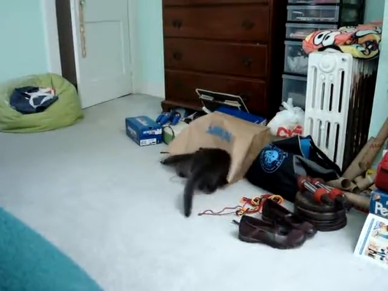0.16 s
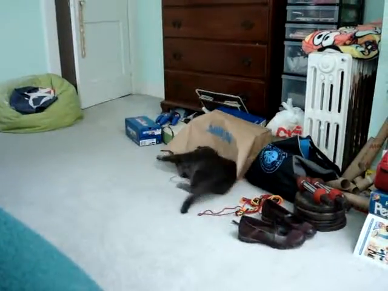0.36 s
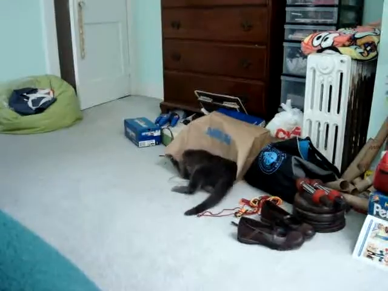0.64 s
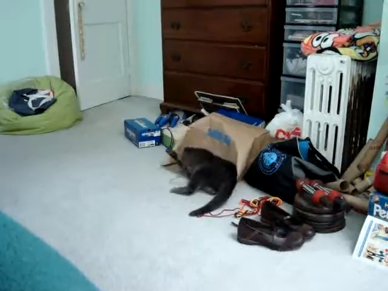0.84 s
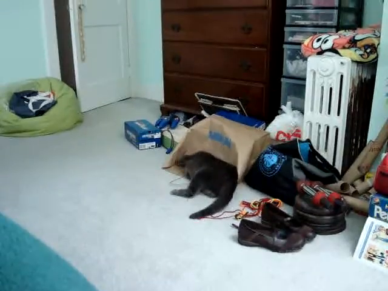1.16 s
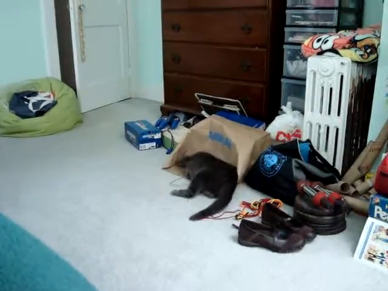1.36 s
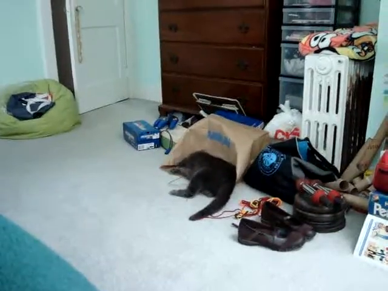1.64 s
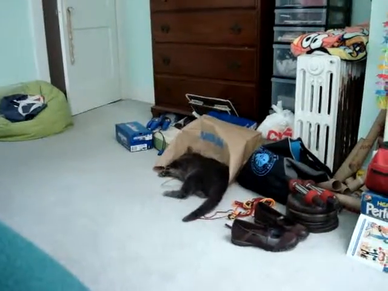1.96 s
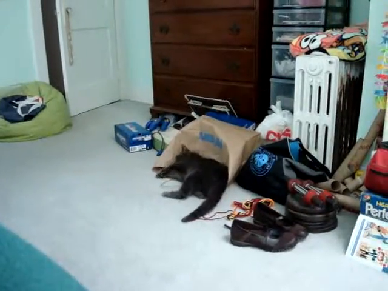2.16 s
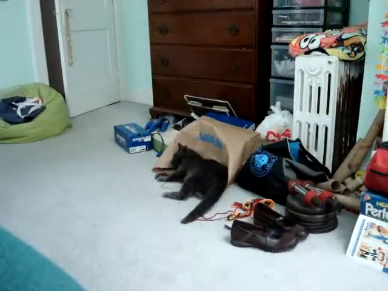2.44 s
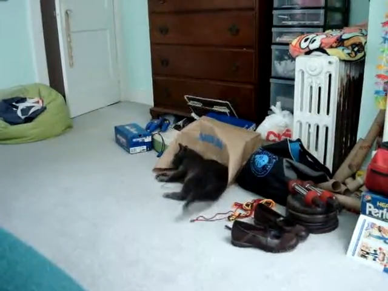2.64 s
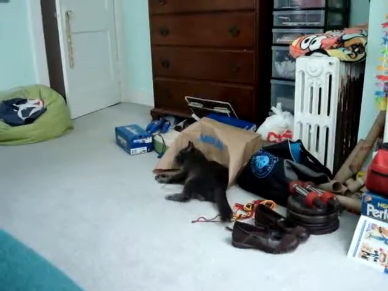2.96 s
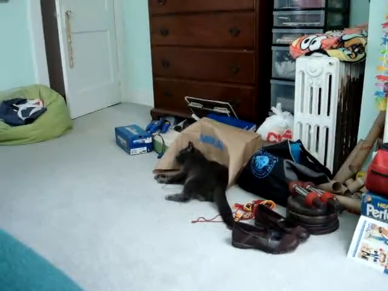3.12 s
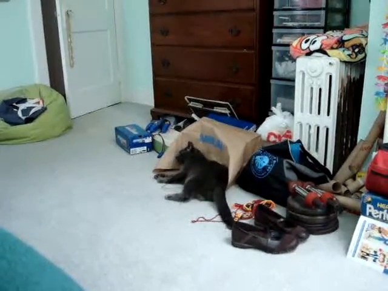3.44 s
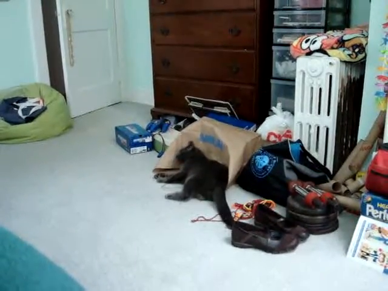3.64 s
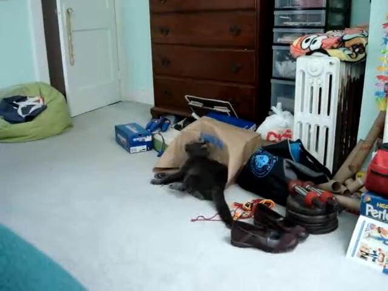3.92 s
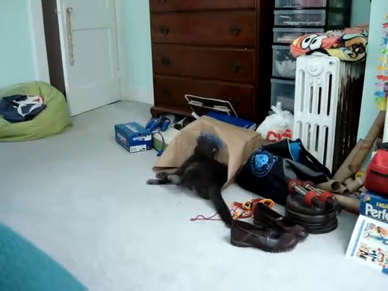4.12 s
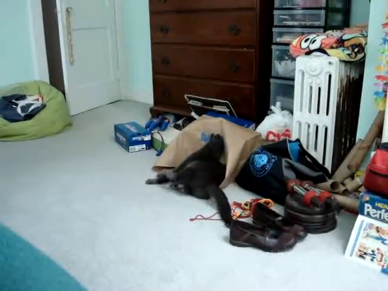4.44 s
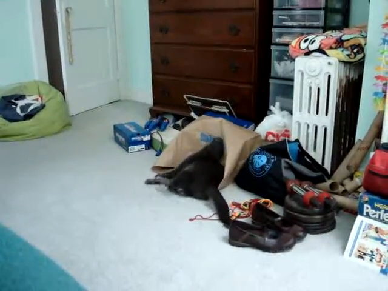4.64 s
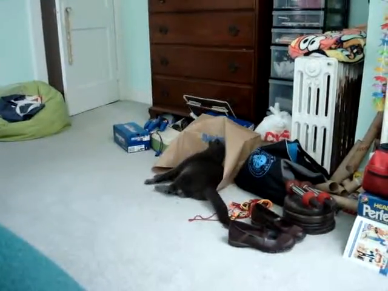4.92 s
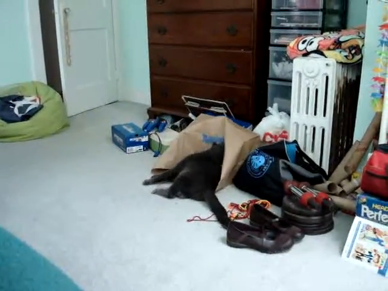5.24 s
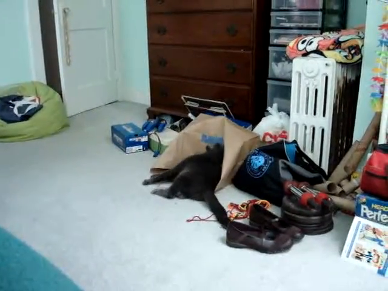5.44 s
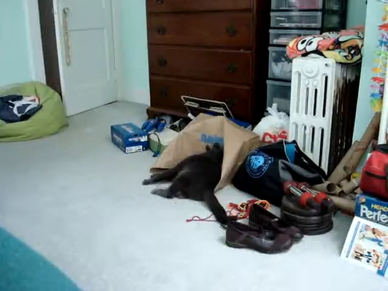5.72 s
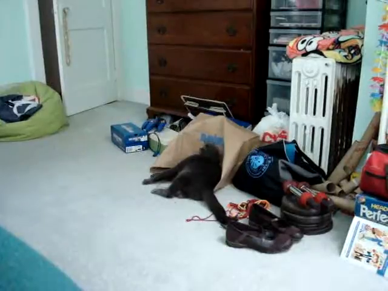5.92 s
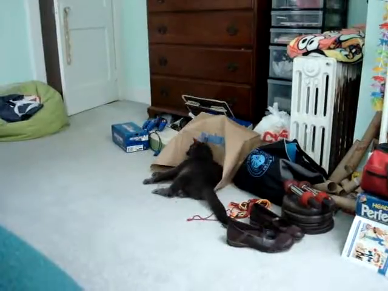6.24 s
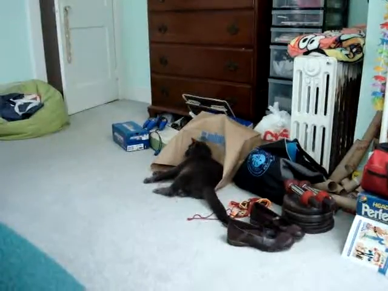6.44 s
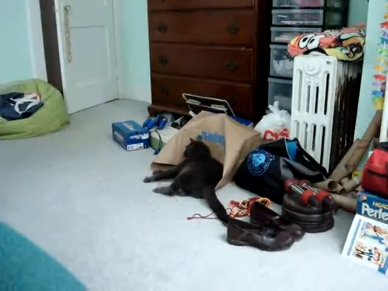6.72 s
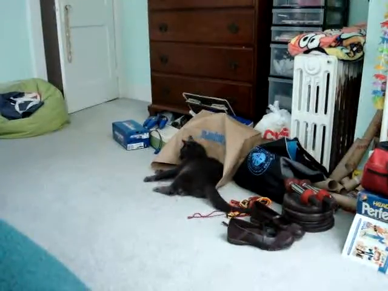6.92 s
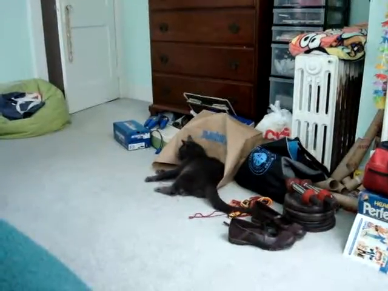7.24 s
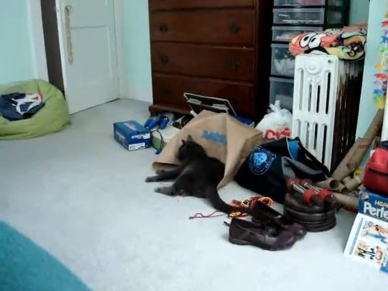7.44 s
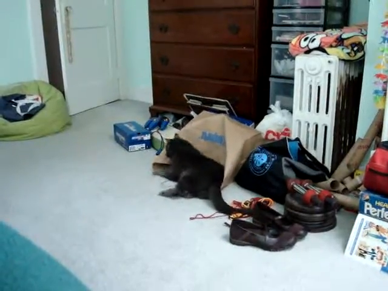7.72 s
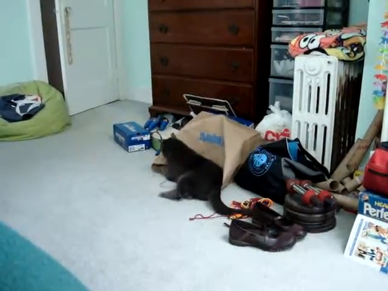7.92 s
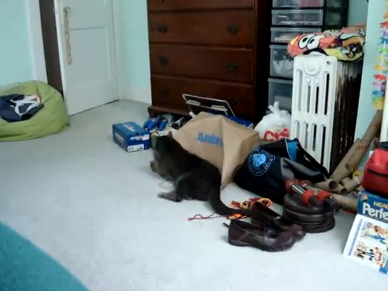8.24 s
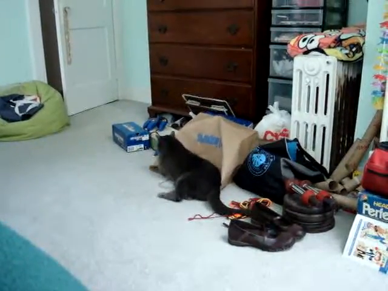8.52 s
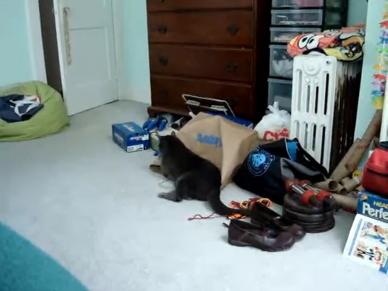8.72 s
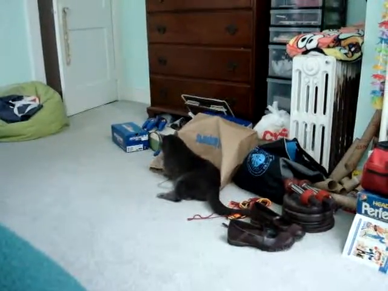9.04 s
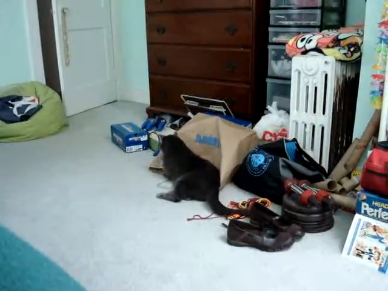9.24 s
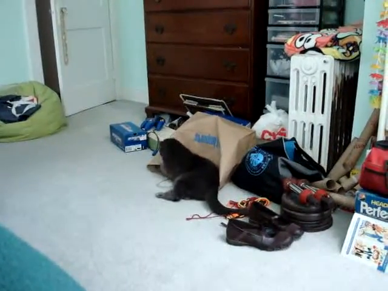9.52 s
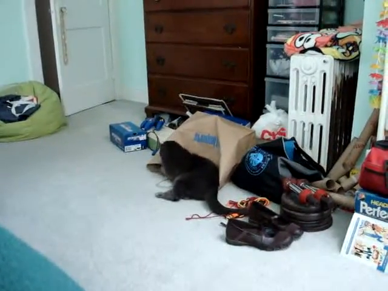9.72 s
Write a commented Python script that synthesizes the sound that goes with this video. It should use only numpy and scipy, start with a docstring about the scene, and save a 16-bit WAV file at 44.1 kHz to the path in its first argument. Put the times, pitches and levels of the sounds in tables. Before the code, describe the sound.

Dry paper rustles in short pushes, with boxy panel pops and an occasional sharp crease snap. The opening is loudest and densest; later bursts are sparse and lighter, separated by quiet stretches of low hiss and a barely audible thin whine. Heard from a few steps away in a small furnished room with a brief decaying echo.

```python
"""A paper shopping bag rustles as a cat noses and paws about in it on the carpet of a small bedroom.
Sliding paper is a dense train of tiny slips and flexing panels a sparser, duller one, swelling with each push.
Stiff panels buckle with hollow pops, made as chains of impulses through resonant bands; some snap at a crease.
The microphone is a few steps away, so much of the sound is decaying room echo, over a steady hiss
of shaped noise with a faint whine of narrow noise bands."""
import sys
import numpy as np
from scipy import signal
from scipy.fft import rfft, irfft
from scipy.io import wavfile

SR = 44100
rng = np.random.default_rng(int(sys.argv[2]) if len(sys.argv) > 2 else 0)


def generate_wav(sig):
    """Save sig (samples, or channels by samples) to the path in sys.argv[1] as 16-bit PCM at SR."""
    pcm = np.round(np.clip(np.atleast_2d(sig).T, -1, 1) * 32767).astype(np.int16)
    wavfile.write(sys.argv[1], SR, pcm)


N = 435266

# Spectral density of the steady hiss: frequency_hz, relative_level_db
HISS_SPECTRUM = [(15, -55), (25, -21), (90, -15), (131, -6), (172, -7), (216, -3), (356, -3), (446, -3),
                 (602, -3.5), (876, -5), (993, -6), (1310, -7), (5590, -15.5), (7750, -16.5), (9950, -20),
                 (12900, -70), (21900, -120)]
HISS_LEVEL_DB = -55
# Faint whine of the electronics: frequency_hz, level_db
WHINE_LINES = [(7553, -78), (7580, -77.5), (7822, -79.5), (7854, -81)]
# Reverberation of the bedroom: bass_decay_s, treble_decay_s (both to -60 dB), crossover_hz
ROOM_DECAY = (0.45, 0.3, 436)
# First echoes, off the clutter beside the bag, the dresser and the wall: delay_s, level_db (re direct sound)
FIRST_ECHOES = [(.0027, -15.5), (.0099, -5.5), (0.0165, -7)]
# Resonances of the bag, its air and its panels: frequency_hz, width_hz, lift_db
BAG_RESONANCES = [(207, 30, 4.5), (328, 52, 5), (448, 50, 2), (534, 40, 3.5), (651, 94, 5.5),
                  (868, 6.6, -5), (947, 40, 3.5), (1053, 31, 4), (1176, 27, 4.5), (1350, 28, 3),
                  (1424, 25, 5), (1540, 41, 2.5), (1880, 15, 2), (1930, 20, 4), (2020, 46, 2),
                  (2200, 50, 2), (2520, 25, 0.5), (2720, 34, 1.5), (2870, 42, 3)]
# Spectral density of sliding paper: frequency_hz, relative_level_db
SLIDE_SPECTRUM = [(60, -50), (200, -21), (600, -6.5), (1500, -2), (3200, -1.5), (5000, -4), (7000, -9.5),
                  (10000, -15)]
# Spectral density of flexing panels: frequency_hz, relative_level_db
FLEX_SPECTRUM = [(50, -39.5), (100, -11.5), (150, -7.5), (200, -3), (400, -2), (700, 1), (1200, 1),
                 (2000, -9), (3500, -14.5), (9000, -44)]
# Each buckling panel or snapping crease: start_s, level_db, ring_hz, upper_edge_hz, run_s (time it keeps running)
BUCKLES = [(0.104, -36.5, 600, 1500, 0.024), (0.136, -37.5, 410, 2360, 0.013),
           (0.189, -42.5, 610, 1400, 0.013), (0.243, -39.5, 650, 3160, 0.028),
           (0.277, -39, 1120, 1600, 0.017), (0.329, -40.5, 610, 1900, 0.026),
           (0.377, -41.5, 1100, 1900, 0.011), (0.4068, -38.5, 2600, 5250, 0),
           (0.42, -43.5, 1100, 5000, .033), (0.499, -39, 233, 1260, 0), (0.6, -41, 615, 1050, 0.0057),
           (0.6992, -31.5, 700, 1510, 0.0023), (0.717, -39, 640, 1700, 0.01),
           (0.821, -27, 1050, 3100, .009), (0.917, -41, 600, 2450, 0.0062),
           (0.995, -40.5, 1930, 2770, 0.022), (1.027, -43, 1000, 1300, 0),
           (1.0985, -31, 1390, 2800, 0.0032), (1.693, -43, 1280, 1800, 0.016),
           (1.786, -41.5, 1230, 1700, 0), (1.806, -45, 645, 2920, 0.0096), (4.352, -44.5, 500, 900, 0.022),
           (4.389, -55, 370, 1500, 0.0081), (4.411, -38, 885, 1250, 0.0098),
           (4.436, -39.5, 640, 1250, 0.018), (4.4725, -32, 3720, 5930, 0), (4.61, -53.5, 220, 640, 0.042),
           (4.826, -40.5, 215, 590, 0.019), (4.92, -48.5, 920, 1300, 0.0025), (4.97, -45, 600, 900, 0.016),
           (5.355, -39.5, 610, 1400, 0.016), (5.452, -44, 674, 1350, .015), (6.1921, -43, 780, 1950, 0.015),
           (7.68, -55.5, 600, 1110, 0.005), (7.841, -47, 620, 3000, 0.011), (7.982, -45, 734, 1270, 0.02),
           (8.124, -41.5, 640, 1500, .024), (8.27, -45.5, 1080, 1080, 0.0056),
           (8.377, -42.5, 1300, 2000, 0.005), (8.402, -38, 2000, 2370, 0.015),
           (8.683, -30, 590, 2250, 0.028), (8.964, -45, 1190, 1510, 0.0067), (9.135, -46, 660, 2900, .012),
           (9.418, -54.5, 580, 1300, 0.014), (9.499, -41, 690, 1040, 0.014), (9.629, -37.5, 1090, 1790, 0),
           (9.823, -52.5, 1740, 3300, 0.012)]
# Each push of paw, head or flank against the paper; rustle() trims both levels:
# start_s, length_s, slide_level_db, flex_level_db, extra_slide_treble_db
PAPER_PUSHES = [(-0.02, 0.092, -42, -38, -3), (0.08, 0.13, -43.5, -45, 0.5), (0.227, 0.17, -45, -44, 0),
                (0.406, 0.065, -43.5, -35.5, 1), (0.48, 0.17, -46, -46, -2.5), (0.648, 0.11, -40.5, -34, 0),
                (0.747, 0.11, -37.5, -38, -2), (0.877, 0.15, -43, -50, 0.5), (1.056, 0.063, -38, -37, -5.5),
                (1.134, 0.15, -56, -58, -5), (1.485, 0.11, -52, -50.5, -2), (1.559, 0.12, -45, -49, -1),
                (1.712, 0.12, -46.5, -48.5, -3), (2.04, 0.26, -64.5, -62.5, 0),
                (2.268, 0.066, -62, -53.5, 1), (4.244, 0.2, -54.5, -54, -3), (4.332, 0.12, -49.5, -43, 0),
                (4.607, 0.15, -67, -61, 2), (4.788, 0.12, -45, -42, 0.5), (4.937, 0.12, -53.5, -52.5, -4),
                (5.204, 0.1, -57.5, -58, 0), (5.304, 0.066, -42, -46.5, 2.5), (5.414, 0.12, -56, -51, -1.5),
                (5.593, 0.11, -64, -65, -4), (6.044, 0.075, -53, -49.5, -5), (6.093, 0.074, -49.5, -58, -3),
                (7.744, 0.051, -48.5, -45.5, -4.5), (7.794, 0.09, -50, -48.5, 0.5),
                (7.888, 0.11, -48, -45, -4), (8.021, 0.05, -43.5, -40, -1.5), (8.09, 0.043, -50, -47, 0),
                (8.162, 0.19, -61, -52.5, -1), (8.291, 0.086, -50.5, -51, -3),
                (8.361, 0.088, -47, -40, 2.5), (8.463, 0.076, -52.5, -59, -1.5),
                (8.613, 0.15, -45.5, -50, -6), (8.78, 0.11, -52, -60, -1.5), (8.92, 0.15, -57, -51.5, -1),
                (9.017, 0.082, -46, -45.5, -1.5), (9.105, 0.091, -51.5, -60, 0.5),
                (9.373, 0.051, -53.5, -59, -3), (9.514, 0.18, -54, -56, -3.5), (9.69, 0.077, -57, -64, -2),
                (9.8, 0.1, -59, -61, -6)]

# A push swells as a power of a half sine; the paper then settles, this much lower and dying at this rate
ARCH_POWER, SETTLE_DB, SETTLE_DB_PER_S = 0.23, -7, 129
LOW_EDGE_SHARE = 0.27  # lower edge of a pop as a share of the geometric mean of ring and upper edge
EDGE_HZ = 10120  # upper band limit of the whole sound
TAPS = 4096
HZ = np.fft.rfftfreq(TAPS, 1 / SR) + 1  # kept above zero, for ratios and logarithms


def gain_of(db):
    """Level law: decibels to an amplitude ratio."""
    return 10 ** (np.asarray(db) / 20)


def evened(x):
    """Normalisation of mean power: scales to an rms of one."""
    return x / np.sqrt(np.mean(x ** 2) + 1e-20)


def read(points, hz):
    """Logarithmic frequency axis: interpolates a table between its points."""
    f, value = np.transpose(points)
    return np.interp(np.log(hz + 1), np.log(f + 1), value)


def add(mix, s, sound):
    """Superposition: sums a sound into the mix from time s (s)."""
    part = mix[max(round(s * SR), 0):][:len(sound)]
    part += sound[:len(part)]


def background(whine_width_hz=24):
    """Filtered noise: broadband noise is the hiss, and narrow resonant bands an unsteady whine."""
    hz = np.fft.rfftfreq(N, 1 / SR)
    air, thin = rfft(rng.standard_normal((2, N)))
    hiss = evened(irfft(air * gain_of(read(HISS_SPECTRUM, hz)), N))
    lines = sum(gain_of(db) / (1 + (2 * (hz - f) / whine_width_hz) ** 2) for f, db in WHINE_LINES)
    whine = evened(irfft(thin * lines, N))
    whine_level = np.linalg.norm([gain_of(db) for f, db in WHINE_LINES])
    return gain_of(HISS_LEVEL_DB) * hiss + whine_level * whine


def room(slips, direct_db, early_s=0.049, gap_s=0.0022, echoes_per_s=9000, size=12288):
    """Statistical reverberation: random echoes follow the decaying energy of the source, split into two bands.

    direct_db is the direct sound relative to the echoes; the first arrive after gap_s."""
    bass_t60, treble_t60, split_hz = ROOM_DECAY
    t, length = np.arange(size) / SR, len(slips) + size - 1
    arrivals = (t > gap_s) * (1 + np.exp(-(t / early_s) ** 2))  # stronger early scatter off the furniture
    tail = np.zeros(length)
    for t60, band in ((bass_t60, "low"), (treble_t60, "high")):
        decay = arrivals * gain_of(-60 * t / t60) ** 2
        power = abs(signal.oaconvolve(slips ** 2, decay / decay.sum()))
        signs = np.sign(rng.standard_normal(length))
        echoes = evened(signs * (rng.random(length) < echoes_per_s / SR))
        split = signal.butter(2, split_hz, band, fs=SR, output="sos")
        tail += signal.sosfilt(split, echoes * np.sqrt(power))
    direct = gain_of(direct_db) * np.pad(slips, (0, size - 1))
    return (direct + tail) / np.hypot(1, gain_of(direct_db))


def click(gain):
    """Minimum phase: the sharpest causal click with this spectrum, of unit energy."""
    log_gain = np.log(np.maximum(gain / gain.max(), 1e-5))
    circle = np.r_[log_gain, log_gain[-2:0:-1]]
    # the Hilbert transform of the log gain is the phase
    spectrum = np.exp(np.conj(signal.hilbert(circle)))[:len(gain)]
    wave = irfft(spectrum)
    return wave / np.linalg.norm(wave)


def bag_gain():
    """Resonance: the modes of the bag colour all that its paper does."""
    return gain_of(sum(db / (1 + (2 * (HZ - hz) / width) ** 2) for hz, width, db in BAG_RESONANCES))


def wrinkles(scatter_db, size=28):
    """Random local modes: every patch of creased paper has its own uneven resonances."""
    knots = np.geomspace(200, 10000, size)
    return gain_of(read(np.c_[knots, scatter_db * rng.standard_normal(size)], HZ))


def bend(wave, lag_s=0.000714, corner_hz=1800):
    """Dispersion: bending waves carry the treble first, so a click spreads into a very short chirp."""
    delay = lag_s / np.sqrt(1 + HZ / corner_hz)
    phase = -2 * np.pi * np.cumsum(delay) * SR / TAPS
    return irfft(rfft(wave) * np.exp(1j * phase))


def pop_band(ring_hz, high_hz, ring_db=4, ring_q=4, bass_hz=195, slope=3.4, crack_db=-38):
    """Radiation efficiency: a smaller, brighter panel radiates less bass; its ring is a resonant peak."""
    low_hz = LOW_EDGE_SHARE * np.sqrt(ring_hz * high_hz)
    band = 1 / np.sqrt((1 + (low_hz / HZ) ** 2) * (1 + (bass_hz / HZ) ** 6))
    band *= 1 / np.sqrt(1 + (HZ / high_hz) ** (2 * slope)) + gain_of(crack_db)  # a faint crack above the edge
    return band * gain_of(ring_db / (1 + (2 * ring_q * np.log(HZ / ring_hz)) ** 2))


def pop(db, ring_hz, high_hz, run_s, run_db=-4, flips_per_s=620, direct_db=-4.0, count=24):
    """Snap-through buckling: a panel flips and rings briefly, then a chain of smaller flips runs on."""
    when = (np.arange(1, count + 1) + rng.uniform(-.5, .5, count)) / flips_per_s
    size = gain_of(run_db) * rng.uniform(0.54, 1, count) * rng.choice([-1, 1], count)
    size *= when < run_s
    flips = np.bincount(np.r_[0, when * SR].astype(int), np.r_[1, size])
    arrivals = room(flips, direct_db, gap_s=0.00063)
    for delay, echo_db in FIRST_ECHOES:
        add(arrivals, delay, flips * gain_of(direct_db + echo_db) / np.hypot(1, gain_of(direct_db)))
    panel = bend(click(pop_band(ring_hz, high_hz) * bag_gain() * wrinkles(scatter_db=1.46)))
    heard = signal.fftconvolve(arrivals, panel)
    # the level is the rms of the pop's energy spread over a twentieth of a second
    return gain_of(db) * heard / np.linalg.norm(heard) * np.sqrt(SR / 20)


def effort(t, length):
    """Energy envelope: the power of a push swells, eases off and leaves the paper settling."""
    arch = np.sin(np.pi * np.clip(t / length, 0, 1)).clip(0) ** ARCH_POWER
    settling_db = SETTLE_DB - SETTLE_DB_PER_S * np.maximum(t - length, 0)
    settling = np.minimum(t / length, 1) * gain_of(settling_db)
    return arch ** 2 + settling ** 2


def pushing():
    """Addition of powers: overlapping pushes give the levels of slide, flex and slide treble (dB)."""
    power, t = np.full((3, N), 1e-12), np.arange(SR) / SR
    for start, length, slide_db, flex_db, treble_db in PAPER_PUSHES:
        push = effort(t, length)[t >= -start]  # a push already under way loses its beginning
        for layer, db in zip(power, (slide_db, flex_db, slide_db + treble_db)):
            add(layer, start, gain_of(db) ** 2 * push)
    return 10 * np.log10(power)


def crinkle(level_db, colour, per_s, spread_db, scatter_db, direct_db,
            clump_db=1.77, clumps_per_s=55, count=24, size=1200):
    """Stick-slip friction: many tiny slips of uneven size, in clumps, excite patch after patch of paper."""
    paper = gain_of(read(colour, HZ)) * bag_gain()
    patches = [bend(click(paper * wrinkles(scatter_db))) for _ in range(count)]
    slips = (rng.random(N) < per_s / SR) * rng.choice([-1, 1], N)
    grip = np.interp(np.arange(N) * clumps_per_s / SR, np.arange(N), rng.standard_normal(N))
    sizes = gain_of(spread_db * np.minimum(rng.exponential(1, N), 3.5) + clump_db * grip)
    drive = room(evened(slips * sizes) * gain_of(level_db), direct_db)
    out = np.zeros(N)
    for start in range(0, N, size):  # the contact wanders to another patch every size samples
        patch = patches[rng.integers(count)]
        add(out, start / SR, signal.fftconvolve(drive[start:start + size], patch))
    return out


def rustle(slide_trim_db=2, flex_trim_db=-1, treble_hz=4500):
    """Event density: sliding makes a fine dense fizz, flexing makes fewer, duller crumples."""
    slide, flex, bright = pushing()
    fizz = crinkle(slide + slide_trim_db, SLIDE_SPECTRUM, per_s=2400,
                   spread_db=3.5, scatter_db=2.0, direct_db=0.0)
    treble = signal.sosfiltfilt(signal.butter(2, treble_hz, "high", fs=SR, output="sos"), fizz)
    crumple = crinkle(flex + flex_trim_db, FLEX_SPECTRUM, per_s=450,
                      spread_db=2.5, scatter_db=3.0, direct_db=-4)
    return fizz + (gain_of(bright - slide) - 1) * treble + crumple


def scene():
    """Linear superposition: background, rustle and pops meet at one microphone."""
    mix = background() + rustle()
    for start, *buckle in BUCKLES:
        add(mix, start, pop(*buckle))
    return mix[None]


def record(dry):
    """Band limiting: a steep low-pass filter removes the highest treble."""
    low_pass = signal.firwin(1023, EDGE_HZ, window=("kaiser", 9), fs=SR)
    return signal.oaconvolve(dry, low_pass[None], "same")


dry = scene()
out = record(dry)
generate_wav(out)
```